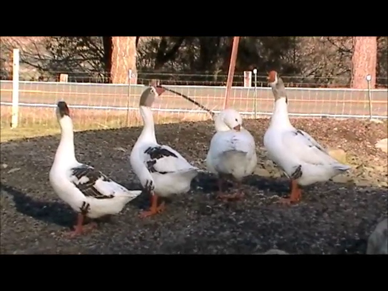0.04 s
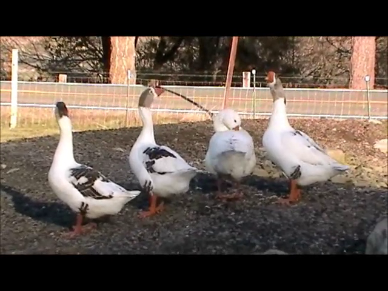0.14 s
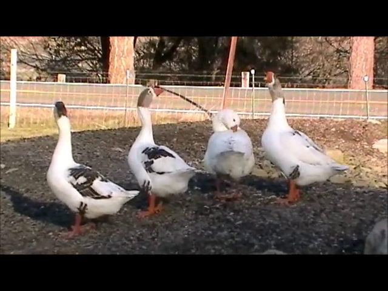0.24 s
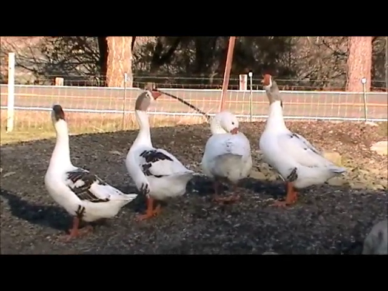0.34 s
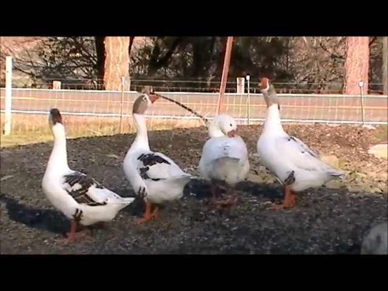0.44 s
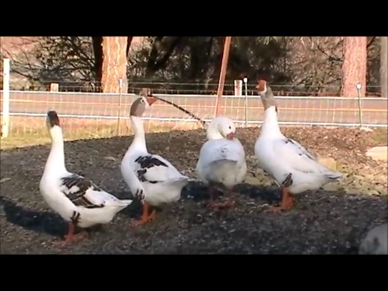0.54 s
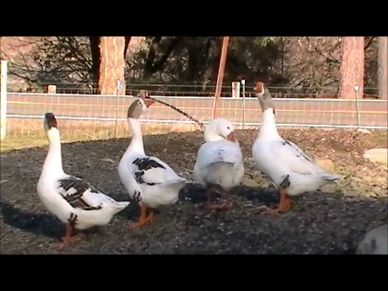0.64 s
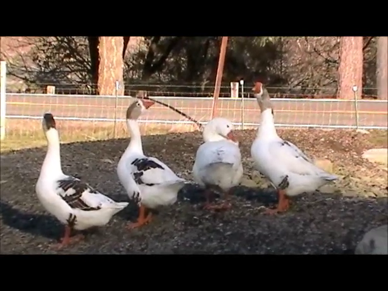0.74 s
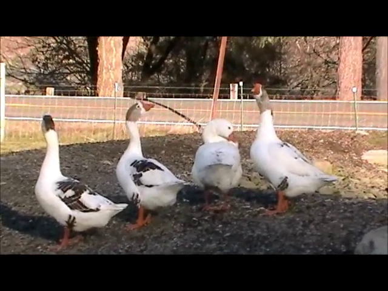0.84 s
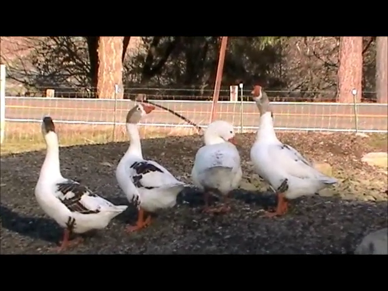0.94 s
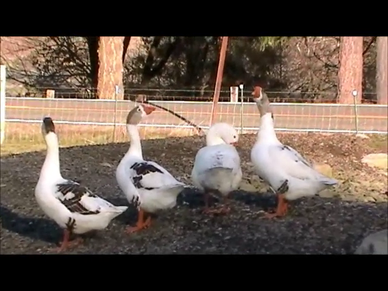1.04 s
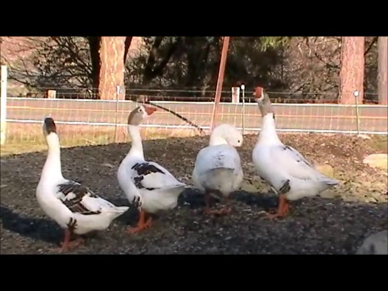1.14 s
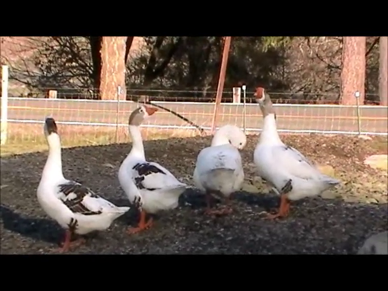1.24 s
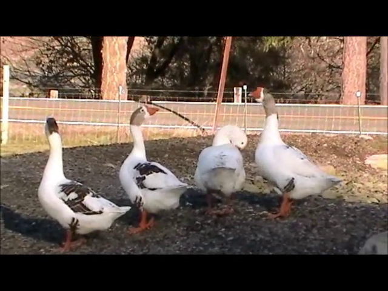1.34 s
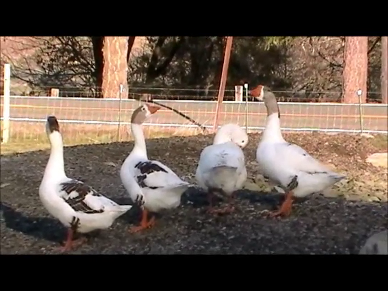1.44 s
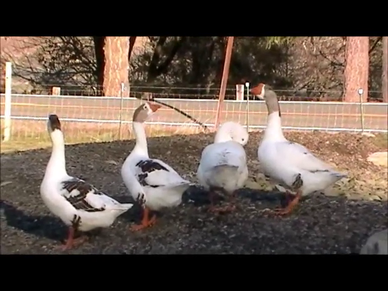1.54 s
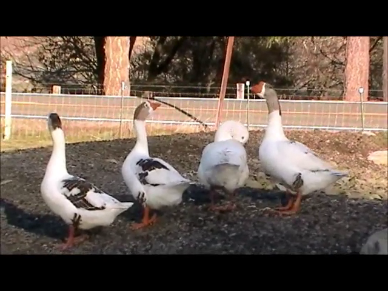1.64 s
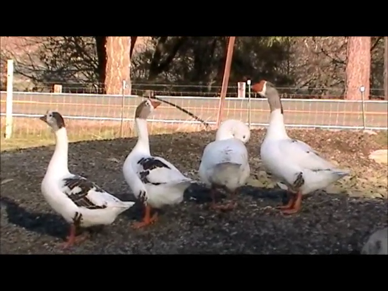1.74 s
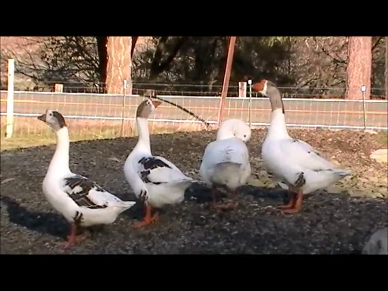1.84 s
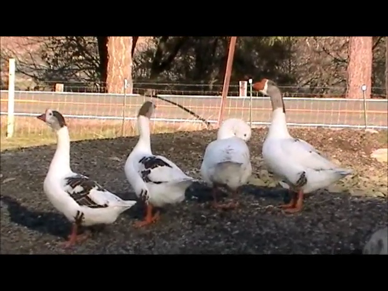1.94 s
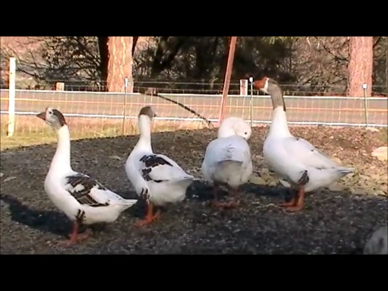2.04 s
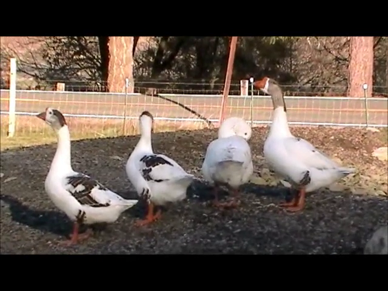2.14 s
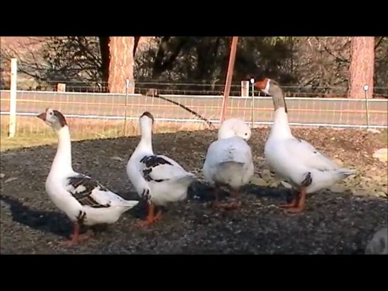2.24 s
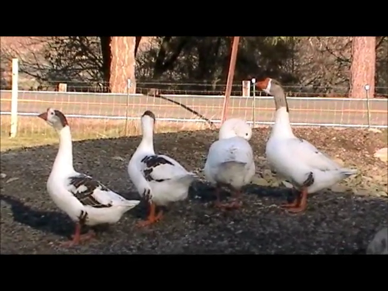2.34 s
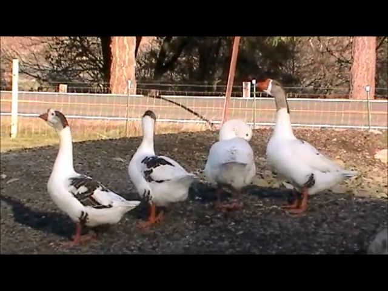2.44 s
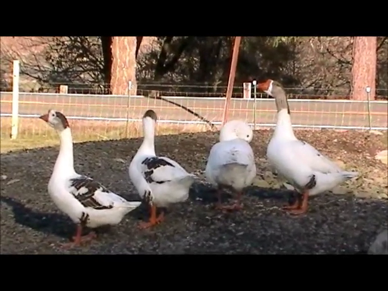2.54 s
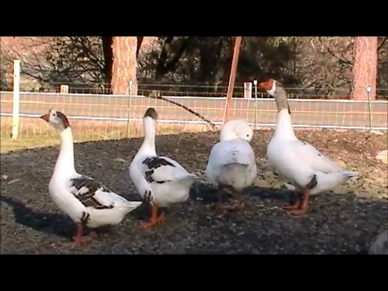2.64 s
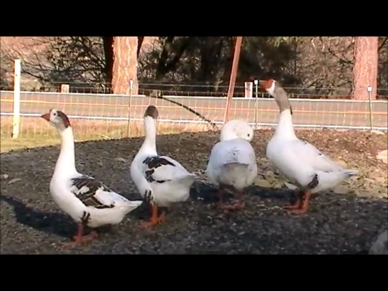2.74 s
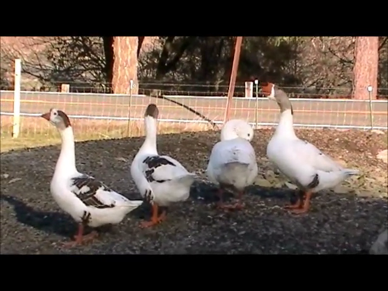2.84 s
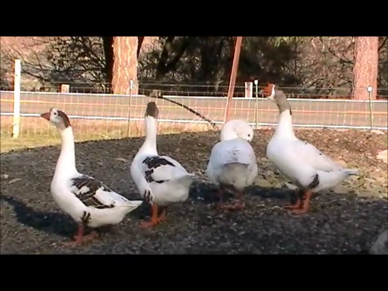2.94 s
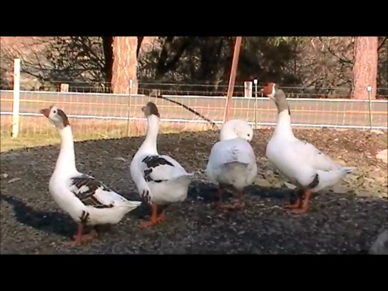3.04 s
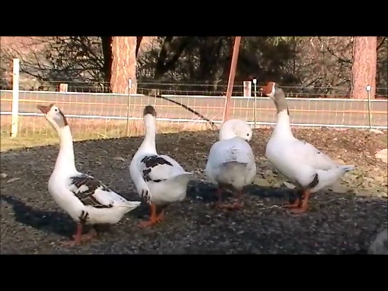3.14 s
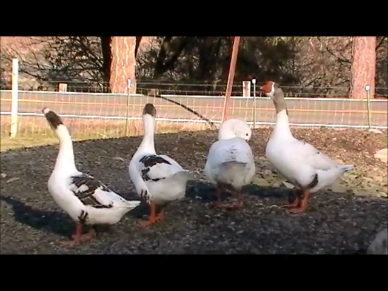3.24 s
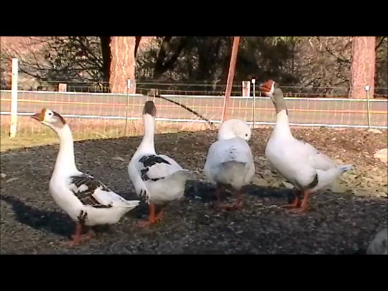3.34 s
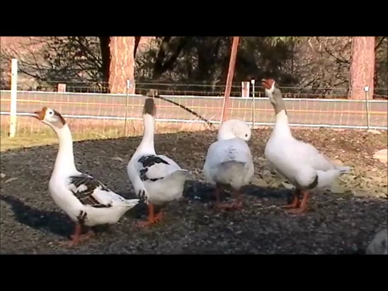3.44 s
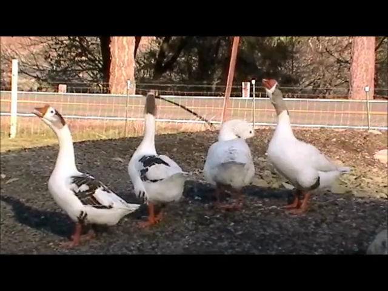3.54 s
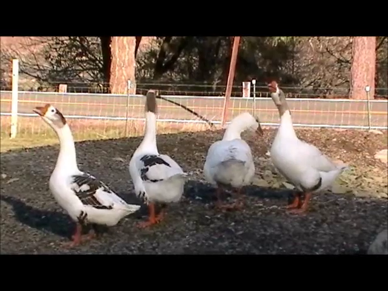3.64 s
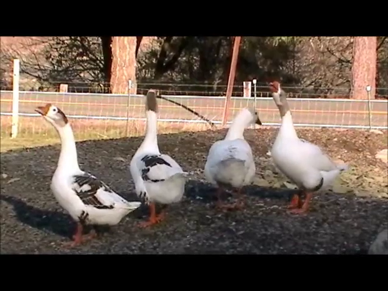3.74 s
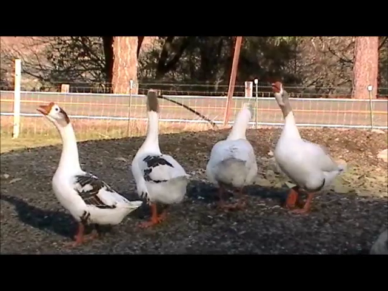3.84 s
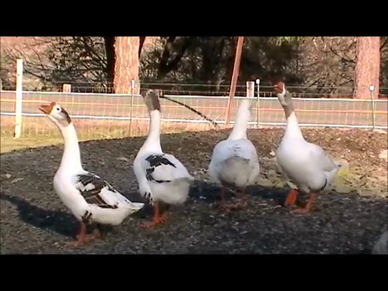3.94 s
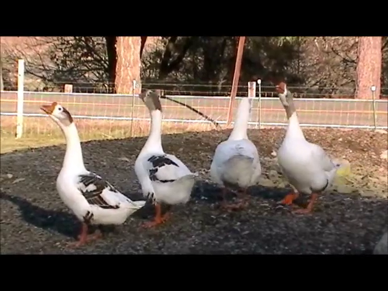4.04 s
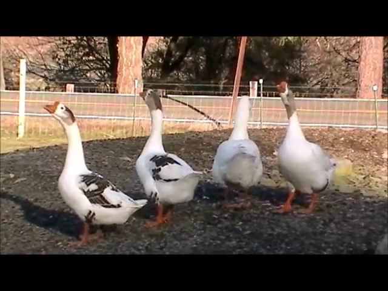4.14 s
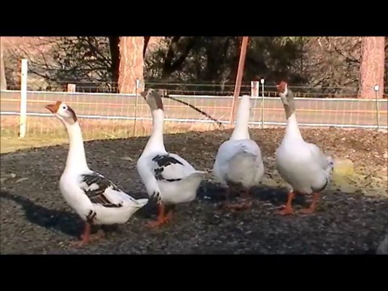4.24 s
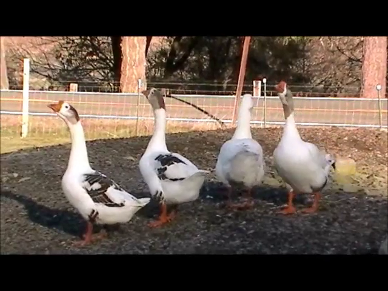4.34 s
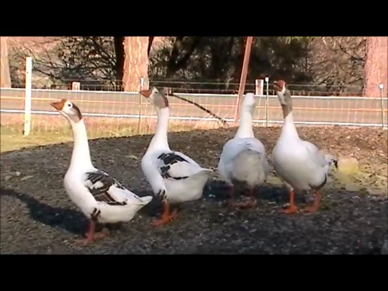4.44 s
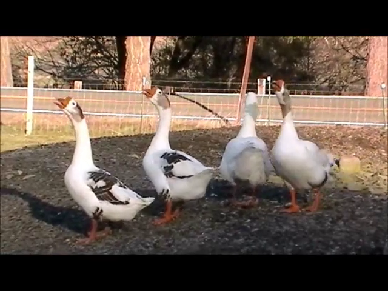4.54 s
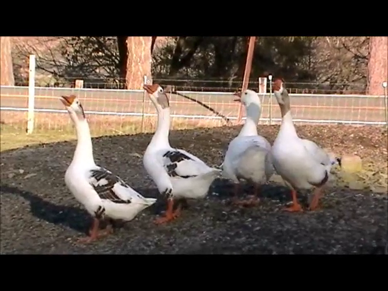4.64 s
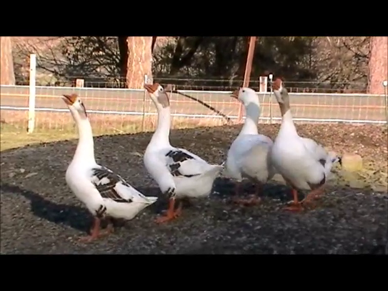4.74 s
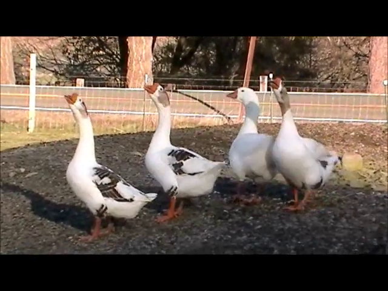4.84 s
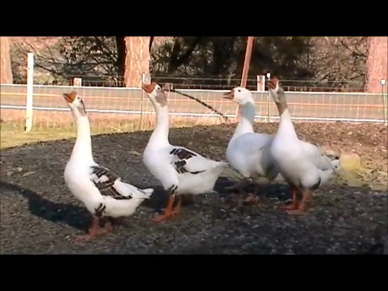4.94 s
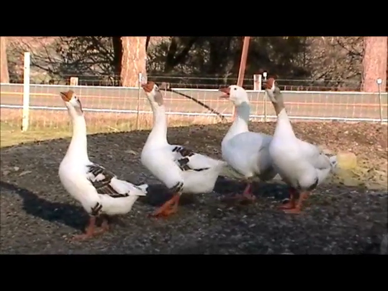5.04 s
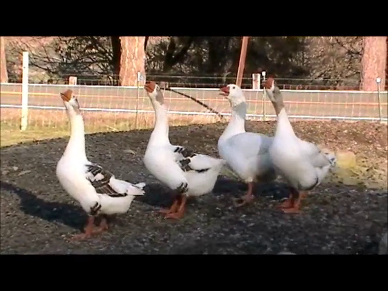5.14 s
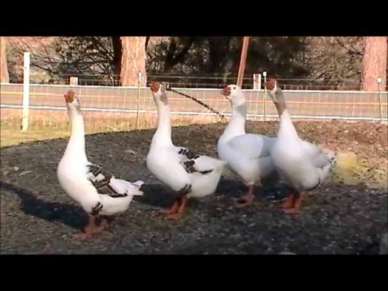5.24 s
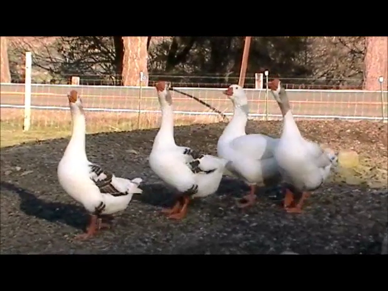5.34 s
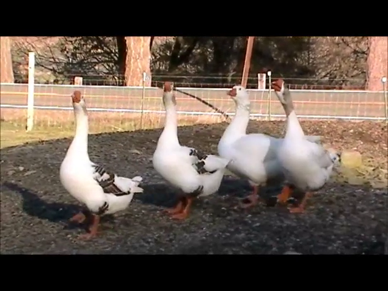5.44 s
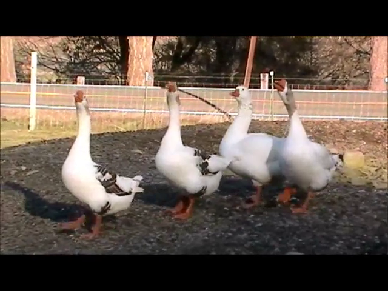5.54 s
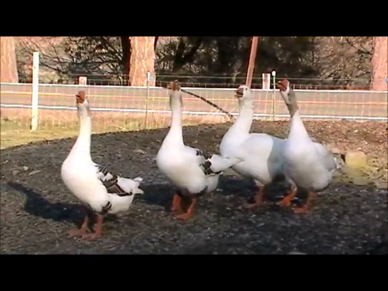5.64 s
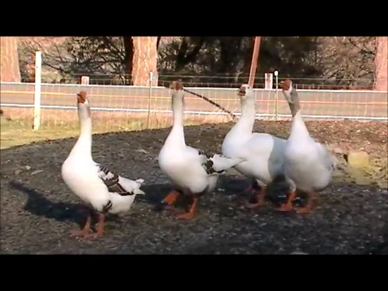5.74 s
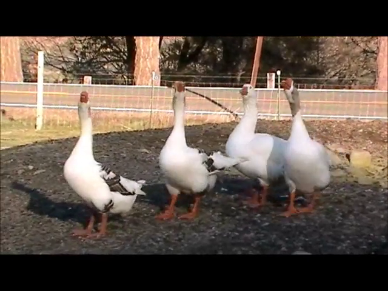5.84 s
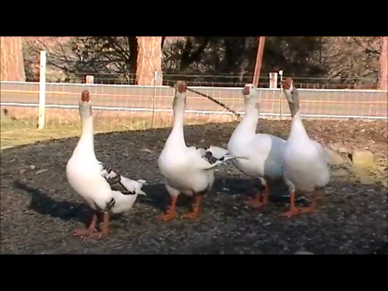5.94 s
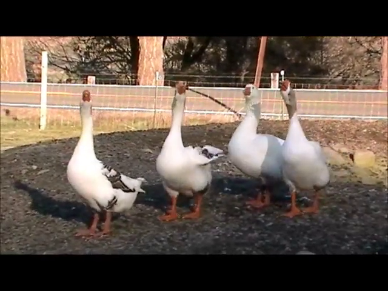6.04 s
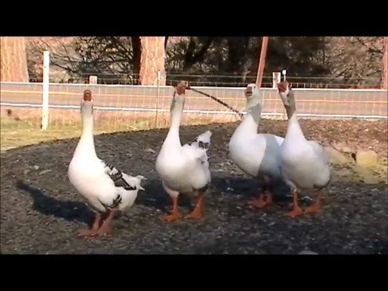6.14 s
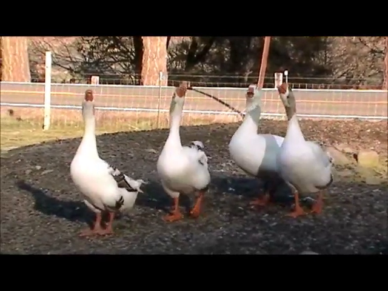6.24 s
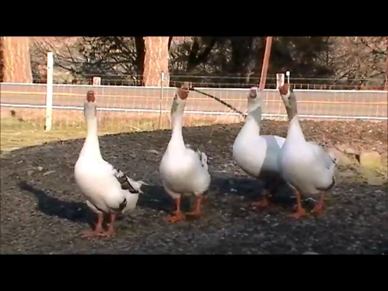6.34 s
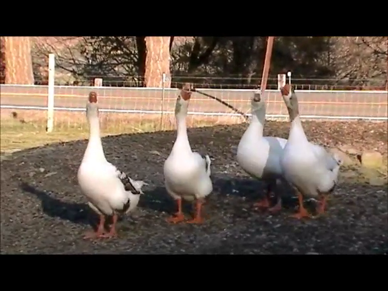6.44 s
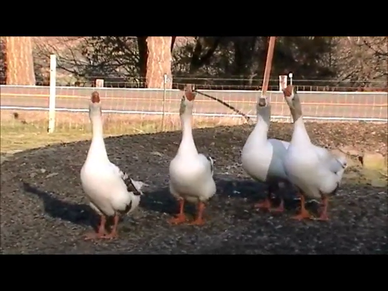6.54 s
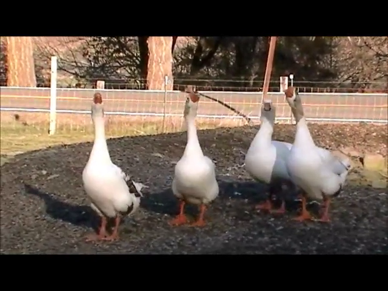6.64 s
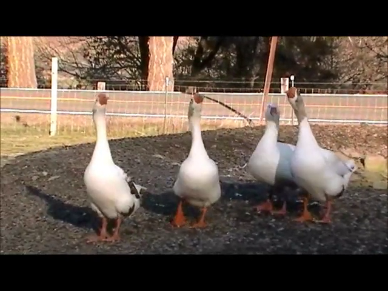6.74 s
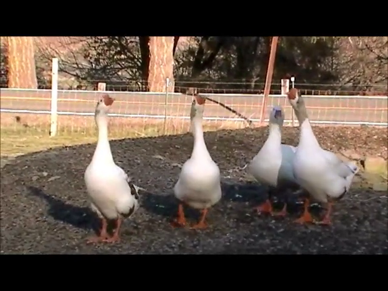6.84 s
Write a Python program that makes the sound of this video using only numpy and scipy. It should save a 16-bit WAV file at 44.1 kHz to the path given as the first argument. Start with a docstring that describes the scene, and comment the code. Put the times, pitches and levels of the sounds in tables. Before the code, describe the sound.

A few geese go from low, soft calls to harsh, brassy honking with whistling squeaks, echoing faintly outdoors.

```python
"""Geese in a farmyard

Farm geese a few metres away mutter softly, then break into loud overlapping honks. A slow valve in each
throat chops the air into rasping bursts while a fast membrane sings over it, at times jumping up into a
whistle. Trees echo the calls; the hand-held camera whines faintly and takes a few knocks."""
import sys
import numpy as np
from scipy import signal
from scipy.fft import rfft, irfft
from scipy.io import wavfile
from scipy.ndimage import uniform_filter1d

SR = 44100
rng = np.random.default_rng(int(sys.argv[2]) if len(sys.argv) > 2 else 0)


def wrap_up_sound(samples):
    """Save the sound to the file named by the first command line argument, as 16-bit audio."""
    columns = np.atleast_2d(samples).T
    # keep every value between -1 and 1, then stretch to whole-number steps
    tamed = np.clip(columns, -1, 1)
    steps = np.round(tamed * 32767).astype(np.int16)
    wavfile.write(sys.argv[1], SR, steps)


N = 303408
TIME = np.arange(N) / SR


def undb(db):
    """Decibels to gain."""
    return 10 ** (np.asarray(db) / 20)


def unit(x):
    """Scale to rms 1."""
    return x / np.sqrt(np.mean(x ** 2) + 1e-20)


def band(x, lo_hz, hi_hz, order=3):
    """Butterworth band-pass."""
    sos = signal.butter(order, [lo_hz, min(hi_hz, .48 * SR)], "band", fs=SR, output="sos")
    return signal.sosfilt(sos, x)


def colour(x, points, size=2048):
    """Minimum-phase EQ through points of (frequency [Hz], gain [dB])."""
    hz, db = np.transpose(points)
    gain_db = np.interp(np.log(np.arange(size // 2 + 1) * SR / size + 1), np.log(hz), db)
    cepstrum = irfft(np.log(undb(gain_db)))
    cepstrum[1:size // 2] *= 2
    cepstrum[size // 2 + 1:] = 0
    return signal.fftconvolve(x, irfft(np.exp(rfft(cepstrum))))[:len(x)]


def wander(t, rate):
    """Random drift of rms 1 that takes a new course rate times a second."""
    steps = (t - t[0]) * rate
    return unit(np.interp(steps, np.arange(4096), rng.standard_normal(4096)))


def clicks(places, sizes, length):
    """Band-limited impulses at fractional sample places."""
    taps = np.floor(places).astype(int)[:, None] + np.arange(-7, 9)
    offset = taps - places[:, None]
    shape = np.sinc(offset) * np.cos(np.pi * offset / 16) ** 2
    return np.bincount(np.maximum(taps, 0).ravel(), (sizes[:, None] * shape).ravel(), length)[:length]


def ramp(distance, reach):
    """Falls smoothly from 1 at distance 0 to 0 at reach."""
    return np.clip(1 - distance / max(reach, 1e-4), 0, 1) ** 2


def envelope(start, length, attack, release, edge_s=.0035, rise_db=18.5, fall_db=24):
    """A call swells, holds and sinks: its samples, age [s], edge fade, attack [dB] and release [dB]."""
    span = np.flatnonzero((TIME > start - edge_s) & (TIME < start + length + edge_s))
    age = TIME[span] - start
    fade = np.clip(np.minimum(age, length - age) / edge_s + 1, 0, 1)
    return span, age, fade, -rise_db * ramp(age, attack), -fall_db * ramp(length - age, release)


def yard(level_db=-66.5):
    """A bed of faint open-air hush, wide in the bass."""
    # spectrum of the still air: (frequency [Hz], level [dB])
    air = [(15, -76), (25, -28), (69, -5), (148, -3.5), (349, -4.5), (631, -5), (895, -4.5), (1020, -7.5),
           (2230, -9), (2420, -10.5), (3630, -15.5), (4750, -16), (5280, -18.5), (15500, -26.5)]
    middle, side = (unit(colour(rng.standard_normal(N), air, size=8192)) for _ in range(2))
    middle *= undb(.5 * wander(TIME, 2.6))
    side = colour(side, [(60, 0.5), (300, 4.0), (1000, -1), (4000, -6), (12000, -24)])
    return undb(level_db) * np.array([middle + side, middle - side])


def camera_whine():
    """Thin, wavering bands of noise that swell briefly, then sink into the hush."""
    # lines of the whine: (frequency [Hz], width [Hz], level before the swell [dB])
    lines = [(2390, 16, -76), (4730, 84, -88), (5960, 150, -91.5)]
    whine = np.zeros(N)
    for hz, width, db in lines:
        line = unit(band(rng.standard_normal(N), hz - width / 2, hz + width / 2, order=1))
        whine += line * undb(db + 2 * wander(TIME, 8.1))
    return whine * undb(np.interp(TIME, [0, .45, 1.0], [-2, 3, -3]))


def camera_knocks():
    """Each knock is a tick and a short thump from three modes of the camera body."""
    # knocks on the body: (time [s], thump [dB], pitch [Hz], decay [s], tick [dB])
    knocks = [(1.468, -54, 235, 0.015, -68), (2.759, -41, 191, 0.0049, -41), (3.406, -43, 232, 0.0081, -46),
              (4.299, -42, 216, 0.0094, -47), (4.884, -65, 260, 0.0063, -49)]
    modes = [(1, 1), (0.78, .5), (1.495, 0.36)]  # (pitch ratio, gain)
    tick_eq = [(300, 0), (1800, 0), (5000, -14), (15000, -22)]
    out, t = np.zeros(N), TIME[:SR // 8]
    for start, thump_db, hz, decay, tick_db in knocks:
        ring = sum(gain * np.sin(2 * np.pi * ratio * hz * t) for ratio, gain in modes)
        thump = 1.14 * ring * np.exp(-t / decay)
        tick = unit(colour(rng.standard_normal(len(t)), tick_eq)) * np.exp(-t / .0018)
        out[int(start * SR):][:len(t)] += undb(thump_db) * thump + undb(tick_db) * tick
    return band(out, 163, 15000, order=2)


def trees(x, scatter_db=-24, t60_s=2.8, width=0.47):
    """A few dull echoes and a thin scattered tail, wider than the direct sound."""
    # echoes from trees and fence: (delay [s], level [dB])
    echoes = [(0.123, -59), (.21, -76), (.31, -30.5)]
    t = TIME[:2 * SR]
    decay = undb(-60 * t / t60_s) * np.minimum(t / 0.016, 1)
    tails = [unit(rng.standard_normal(len(t)) * decay) for _ in range(2)]
    middle, side = undb(scatter_db) * np.array(tails) / np.sqrt(len(t))
    for delay, db in echoes:
        middle[int(delay * SR)] += undb(db)
    dull = colour(x, [(150, -1), (700, -7), (1500, 1), (3000, -2.5), (5000, -9),
                      (8000, -17), (15000, -20)])
    return np.array([signal.fftconvolve(dull, middle + sign * width * side)[:N] for sign in (1, -1)])


def valve_rasp(call, throat, period_scatter, slap_scatter, burst_cycles, air_db, treble_share, count=6):
    """Each opening of the valve lets out a dying run of membrane slaps and a puff of air."""
    (start, length, attack, release, first_hz, mean_slap_hz,
     level_db, swell_db, middle_db, treble_db, chest_db) = call
    span, t, fade, attack_db, release_db = envelope(start, length, attack, release)
    n, past_middle = len(span), t - length / 2
    effort_db = attack_db + release_db + swell_db * past_middle / length
    # as the breath runs out the valve slows, dropping further at the very end, and the slaps quicken
    valve_hz = first_hz * (1 - .12 * t - 0.09 * ramp(length - t, 0.0515))
    slap_hz = mean_slap_hz * (1 + 0.22 * past_middle)
    cycles = np.cumsum(valve_hz * (1 + period_scatter * wander(t, 171.4))) / SR
    opens = np.interp(np.arange(0, cycles[-1]), cycles, np.arange(n))
    drift, force = rng.standard_normal((2, 256, count))[:, :len(opens)]
    # each run of slaps resembles the one before, so the buzz keeps its lines
    drift = unit(uniform_filter1d(drift, size=3, axis=0))
    at, slap = opens.astype(int), np.arange(count)
    lag_s = (slap + slap_scatter * drift * np.sqrt(slap)) / slap_hz[at, None]
    lag_cycles = lag_s * valve_hz[at, None]
    sizes = np.exp(-lag_cycles / burst_cycles) * (lag_cycles < 1) * undb(1.8 * force)
    slaps = unit(clicks((opens[:, None] + lag_s * SR).ravel(), sizes.ravel(), n))
    puffs = unit(np.exp(-(cycles % 1)) * rng.standard_normal(n))
    # three bands, breathier towards the treble
    low, middle, treble = (unit(band(colour(slaps + undb(air_db + extra_db) * puffs, throat), lo, hi))
                           for lo, hi, extra_db in [(384, 1223, 0), (1363, 2900, 2), (3560, 21000, 7)])
    low_effort_db = effort_db + 0.62 * attack_db  # lows and chest hum swell from deeper down
    bite_db = 8 * np.exp(-t / 0.012)
    low *= undb(low_effort_db)
    middle *= undb(middle_db + effort_db * (1 + treble_share) / 2)
    treble *= undb(treble_db + effort_db * treble_share + bite_db)
    chest = np.sqrt(2) * (np.sin(2 * np.pi * cycles) + undb(-26) * np.sin(4 * np.pi * cycles))
    hum = chest * undb(chest_db + low_effort_db + 2.24 * wander(t, 79.4))
    return span, fade * (undb(level_db) * (low + middle + treble) + hum)


def rasps():
    """The flock's rasping calls, coloured by how far the beak opens."""
    # throat EQ with the beak nearly shut, half open and wide open: (frequency [Hz], gain [dB])
    shut = [(400, -24), (650, -22.5), (830, -3.5), (1100, -11), (1450, -18), (1900, -3.5), (2400, 1),
            (3050, -17), (3700, -16.5), (4800, -21.5), (6200, -27), (8000, -29), (12000, -32), (15500, -45)]
    half = [(240, -100), (400, -32.5), (673, 2.5), (738, -24.5), (821, 11.5), (1150, -7), (1280, -9.5),
            (1470, -33), (1590, -9.5), (1880, -12), (2060, -16), (3300, -12), (7100, -27), (9950, -27),
            (15500, -49)]
    wide = [(240, -75), (400, -50), (543, -8.5), (761, -11), (900, -0.5), (1150, -3.5), (1260, -5),
            (1470, -11.5), (1760, -2), (2060, -4.5), (3790, -8), (5070, -9), (5820, -11), (10900, -21.5),
            (15500, -43.5)]
    # cue lists: (start [s], length [s], attack [s], release [s], valve [Hz], slaps [Hz], level [dB],
    # swell over the call [dB], middle re level [dB], treble re level [dB], chest hum [dB])
    mutters = [(1.82, .28, 0.14, 0.2, 156.8, 1170, -50.5, -13.5, -7, -18, -70),
               (2.11, 0.31, 0.062, 0.19, 159, 1085, -43.5, 0.5, -5.5, -18, -62),
               (2.94, 0.29, 0.11, 0.28, 156.7, 1090, -35.5, -1.5, -10, -17, -54),
               (3.15, .205, .035, 0.02, 154.7, 1140, -37.5, -5.5, -2, -13.5, -53.5)]  # soft
    yelps = [(3.457, 0.087, 0.07, 0.039, 182.2, 1387, -38.5, -3, 5.5, 0, -52.5),
             (3.585, 0.076, 0.019, 0.023, 157, 1200, -36, -5, 6, -4, -54.5),
             (3.807, .065, 0.019, 0.028, 182, 1776, -41, -7, 3, 3, -59.5),
             (3.92, .183, 0.039, 0.035, 163.6, 1181, -36.5, 5, 3.5, -8.5, -61)]  # sharp
    buzzes = [(3.635, 0.162, 0.015, 0.021, 319.6, 1240, -46, -8.5, 11.5, 3, -77)]  # the valve beats twice as fast
    brays = [(4.53, 0.17, 0.0054, 0.028, 181.5, 962, -32.5, -5, 1.5, -6.5, -47.5),
             (4.65, 0.3, 0.027, 0.045, 171.2, 1110, -43.5, -26.5, 6.5, 3.5, -60),
             (4.955, 0.2, 0.093, 0.055, 176.1, 1924, -42, -9, 8, 5.5, -50.5),
             (5.07, 0.2, 0.03, 0.051, 170.3, 1090, -41.5, 3.5, 7, -4.5, -55.5),
             (5.586, .165, 0.032, 0.053, 183.9, 913, -35.5, -3.5, 5, -2.5, -45.5),
             (5.72, 0.23, 0.021, .08, 166.4, 1051, -37, -17.5, 3.5, -0.5, -54),
             (6.1, 0.19, 0.039, 0.018, 181, 952, -34, 0.5, 4, -3, -47),
             (6.235, 0.15, 0.037, 0.023, 165.4, 1017, -34, -8, -1, -4.5, -54.5),
             (6.33, 0.15, 0.016, 0.033, 162.9, 1086, -41, -20.5, 5, 1, -64.5)]  # full-throated
    # voicings: (cues, throat, period scatter [share], slap scatter [share], burst decay [cycles],
    # air [dB], effort that the treble follows [share])
    voicings = [(mutters, shut, .014, 0.091, 0.75, -7.5, 0.96),
                (yelps, half, 0.0179, 0.036, 1, -9, 0.86),
                (buzzes, half, 0.0052, 0.011, 1, -8, .9),
                (brays, wide, 0.0096, 0.058, 0.53, -4.5, 0.48)]
    return [valve_rasp(call, *voicing) for cues, *voicing in voicings for call in cues]


def membrane_note(call, overtones, flutter, scatter, half_db, scoop_s, droop_s, flare_db, brighten_db,
                  valve_hz=165.8):
    """The membrane scoops to its pitch, sings and droops; the valve shakes its loudness and pitch."""
    start, length, attack, release, pitch_hz, scoop, droop, level_db, octave_db, overtone_db = call
    span, t, fade, attack_db, release_db = envelope(start, length, attack, release)
    hz = pitch_hz * (1 - scoop * np.exp(-t / scoop_s) - droop * ramp(length - t, droop_s))
    valve = np.sin(2 * np.pi * np.cumsum(valve_hz * (1 + 0.014 * wander(t, 71))) / SR)
    phase = 2 * np.pi * np.cumsum(hz * (1 + scatter * wander(t, 413.3))) / SR + .5 * flutter * valve
    flare = np.exp(-((length - t - 0.036) / 0.067) ** 2)  # the octave flares just before the end
    # overtones speak before the fundamental and die faster
    early_db, dying_db = 0.35 * attack_db, 0.46 * release_db
    bright_db = overtone_db + early_db + dying_db + brighten_db * (t / length - .5)
    partials = [(1, attack_db), (2, early_db + octave_db + flare_db * flare)]
    partials += [(k, bright_db + db) for k, db in enumerate(overtones, 3)]
    # alternately strong and weak swings put half-tones between the overtones
    partials += [(k - .5, db + half_db) for k, db in partials[2:]]
    stack = np.zeros(len(t))
    for k, db in partials:
        flicker_db = min(2 * k, 3) * wander(t, 107)
        stack += undb(db + flicker_db) * np.sin(k * phase + rng.uniform(0, 2 * np.pi))
    shake = (1 + flutter * valve) * undb(wander(t, 62.8))
    return span, np.sqrt(2) * fade * shake * undb(level_db + release_db) * stack


def notes():
    """The flock's pitched calls, from soft coos to breaking squeaks."""
    # cue lists: (start [s], length [s], attack [s], release [s], pitch [Hz], scoop [share],
    # droop [share], level [dB], octave re level [dB], overtones re level [dB])
    coos = [(1.822, 0.18, 0.052, 0.16, 841, .16, 0.033, -46, -13.5, -9.5),
            (1.9, 0.16, 0.044, 0.23, 905, -0.099, 0.03, -37, -40, -23.5),
            (1.98, 0.28, 0.049, 0.025, 758, -0.0017, -0.095, -52.5, -21, -16),
            (2.115, 0.31, 0.16, 0.28, 958, 0.06, 0.16, -35, -31, -19),
            (2.88, 0.29, 0.16, 0.24, 1190, 0.14, 0.057, -40, -27, -19)]  # soft
    honks = [(3.15, 0.13, 0.014, 0.023, 1203, .07, 0.017, -38.5, -15.5, -11.5),
             (3.26, 0.09, 0.0083, 0.041, 1197, 0.0068, 0.142, -34, -6, -6.5),
             (3.457, 0.06, 0.035, 0.01, 1419, .16, 0.025, -33, -13.5, -7.5),
             (3.725, 0.082, 0.019, 0.023, 1025, -0.15, .01, -38.5, -14, -26),
             (3.945, .158, 0.023, 0.016, 1283, .09, 0.15, -36.5, -12.5, -14)]  # fluttering
    blares = [(5.045, 0.2, 0.026, 0.23, 1281, .05, 0.015, -30, -7.5, -15.5),
              (5.73, 0.264, 0.017, 0.064, 1292, .035, 0.032, -36.5, -4, -14),
              (6.24, .243, 0.021, 0.015, 1300, .065, .16, -37, -4.5, -19)]  # steadier, brassy
    cries = [(3.61, 0.091, 0.01, 0.075, 835, 0.066, .01, -40, 8.5, -3),
             (3.675, 0.12, 0.037, 0.058, 967, .015, 0.15, -51, 20, -25),
             (3.8, 0.05, 0.0094, .03, 1015, .18, 0.005, -32, -19, -11),
             (4.68, 0.27, 0.0067, 0.058, 962, 0.051, 0.23, -37, 1, -8),
             (4.72, 0.192, 0.013, 0.011, 861, 0.0203, 0.0064, -35.5, -30, -28),
             (5.1, 0.17, 0.081, 0.051, 940, 0.033, 0.17, -29.5, -19, -20),
             (5.95, 0.04, 0.032, 0.013, 934, 0.0094, 0.24, -41, -15, -15.5)]  # low and clear
    whistles = [(3.5, 0.1126, 0.046, 0.024, 1760, .09, -0.021, -24, -14.5, -17.5),
                (3.848, 0.1, 0.01, 0.037, 1792, 0.034, -0.053, -25, -17.5, -15)]  # the membrane jumps up
    squeaks = [(3.6, 0.035, .012, 0.02, 2350, .22, .01, -43, 6, 0),
               (3.808, 0.056, 0.014, 0.0039, 1890, .11, .01, -40.5, 5, -3.5),
               (3.925, 0.045, 0.0068, 0.026, 2270, .185, 0.016, -40, 2.5, -2.5),
               (4.528, 0.01, .002, 0.011, 2830, 0.0064, .01, -33, -24, -37),
               (4.949, 0.012, 0.0025, .013, 3200, .07, -0.053, -28, -8, -47),
               (4.96, .14, 0.021, 0.029, 1750, .055, -0.0026, -29.5, -9, -16),
               (5.585, 0.021, .002, 0.015, 2790, .003, 0.021, -23, -14.5, -26),
               (5.596, 0.018, 0.024, .015, 1950, 0.14, 0.017, -29.5, 5, -3.5),
               (5.605, 0.063, 0.0079, 0.023, 1836, 0.008, 0.028, -30, -12, -24),
               (6.099, 0.03, 0.0017, 0.029, 2790, 0.0027, -0.084, -23.5, -16, -25),
               (6.11, .035, 0.0061, 0.027, 2075, 0.22, -0.028, -42, 7, 2),
               (6.135, 0.11, 0.0058, .04, 1760, 0.049, .01, -36, -12, -14)]  # rough, where the voice breaks
    # timbres, from harmonic 3 upwards: (level [dB])
    coo_tone = [-0.5, -8.5, -10, -13, -17, -13, -19]
    honk_tone = [-6, -7.5, -15.5, -17, -32.5, -27.5]
    cry_tone = [3, 0.5, -1, -0.5, -6.5, -11, -12.5, -13.5]
    whistle_tone = [2.5, 4, -7, -4.5, -15, -19, -25]
    squeak_tone = [1, -1, -7]
    # voicings: (cues, timbre, flutter depth [0-1], pitch scatter [share], half-tones re overtones [dB],
    # scoop [s], droop [s], octave flare [dB], brightening over the note [dB])
    voicings = [(coos, coo_tone, 0.25, 0.007, -16, .06, 0.32, 0.92, 11),
                (honks, honk_tone, 0.41, 0.0099, -6.5, 0.032, 0.0445, 11.1, -1.1),
                (blares, cry_tone, 0.09, 0.0058, 0.77, .045, 0.1, 8.6, 2.4),
                (cries, cry_tone, 0.098, 0.002, -15, 0.067, 0.054, 0.85, 8.1),
                (whistles, whistle_tone, 0.11, 0.0026, -29, .1, 0.041, 1, -1.1),
                (squeaks, squeak_tone, 0.39, 0.021, -6.5, 0.0297, 0.017, 0.73, -3)]
    return [membrane_note(call, *voicing) for cues, *voicing in voicings for call in cues]


def geese():
    """All rasps and notes of the flock, made brassy by the upper modes of the long windpipe."""
    # windpipe modes: (frequency [Hz], width [Hz], gain [dB])
    modes = [(3744, 250, -0.5), (4540, 660, -2), (5850, 470, 0.5), (6700, 270, -4.5)]
    voices = np.zeros(N)
    for span, sound in rasps() + notes():
        voices[span] += sound
    ring = sum(undb(db) * band(voices, hz - width / 2, hz + width / 2, order=1)
               for hz, width, db in modes)
    # between its modes the pipe passes less
    return voices + ring - .45 * band(voices, 3500, 7500, order=1)


def microphone_ports(x, corner_hz=205):
    """Two close ports widen the bass: the left one leads, more so the lower the sound."""
    # balance of the ports: (frequency [Hz], left re right [dB])
    balance = [(180, -2.6), (500, -.5), (1000, .6), (2000, -.2), (4000, -.4)]
    at_hz, balance_db = np.transpose(balance)
    hz = np.arange(N // 2 + 1) * SR / N + 1
    lead = np.arctan(corner_hz / hz)
    db = np.interp(np.log(hz), np.log(at_hz), balance_db)
    return np.array([irfft(rfft(x) * undb(half * db) * np.exp(1j * half * lead), N)
                     for half in (.5, -.5)])


def scene():
    """The flock stands a little left of centre at first, then almost straight ahead."""
    flock = geese()
    pan_db = np.interp(TIME, [2.0, 4.0, 4.7, 6.3], [1.7, 0.51, 0.7, 0.48])
    direct = microphone_ports(flock) * undb(np.array([pan_db, -pan_db]) / 2)
    return direct + trees(flock) + camera_knocks() + yard() + camera_whine()


def record(dry, ceiling=.26, top_hz=15700):
    """The camera rounds the sharpest peaks and cuts the top."""
    rounded = dry / (1 + (dry / ceiling) ** 4) ** (1 / 4)
    return signal.sosfilt(signal.ellip(10, .2, 80, top_hz, fs=SR, output="sos"), rounded)


dry = scene()
out = record(dry)
wrap_up_sound(out)
```